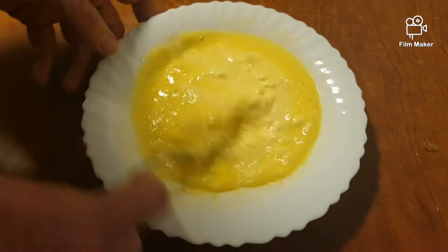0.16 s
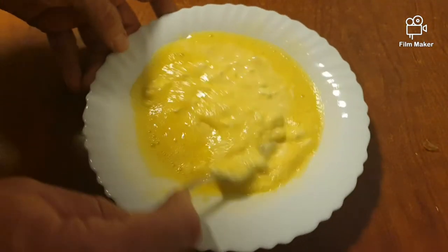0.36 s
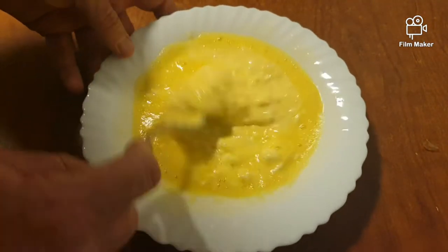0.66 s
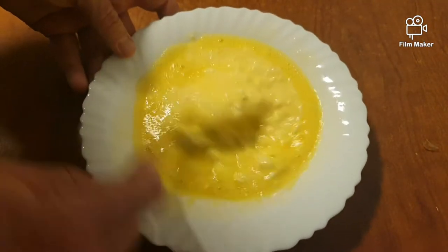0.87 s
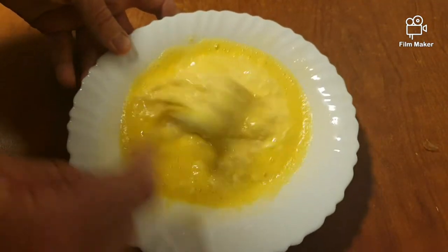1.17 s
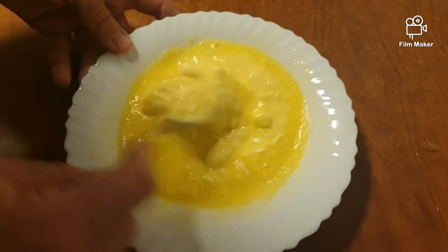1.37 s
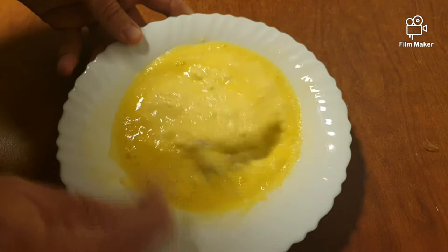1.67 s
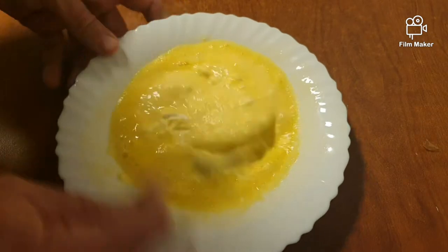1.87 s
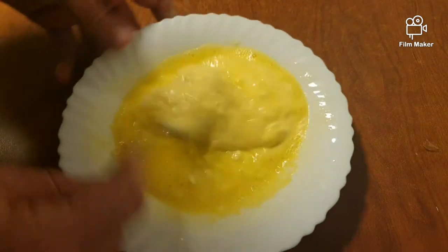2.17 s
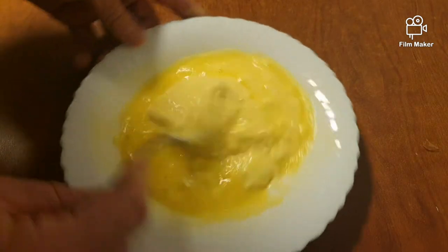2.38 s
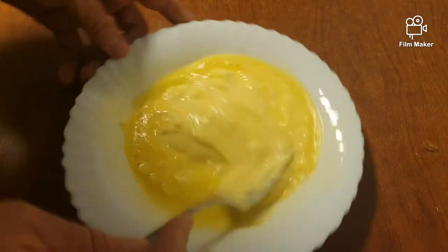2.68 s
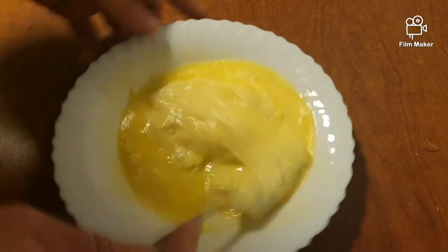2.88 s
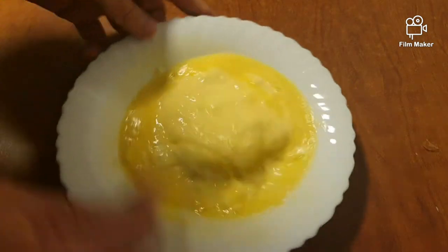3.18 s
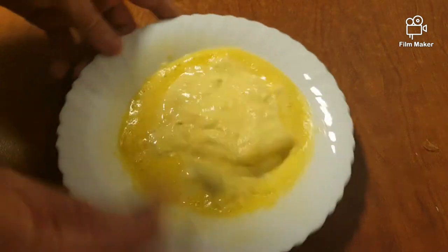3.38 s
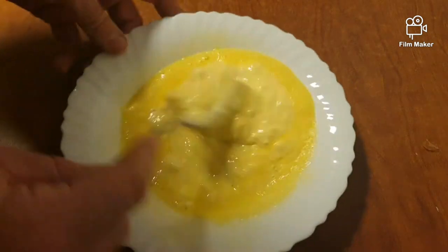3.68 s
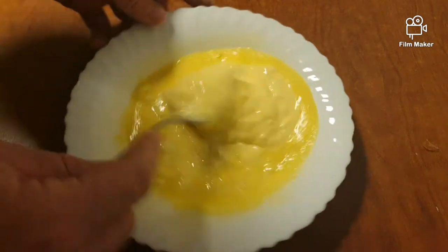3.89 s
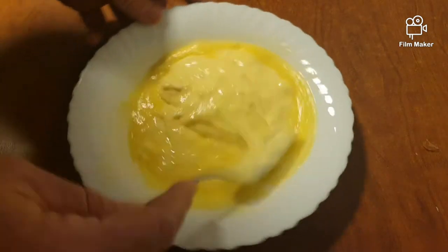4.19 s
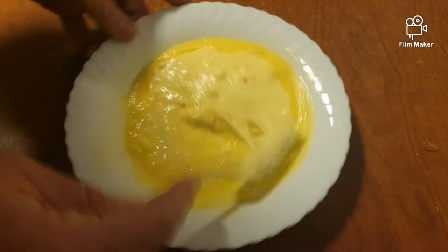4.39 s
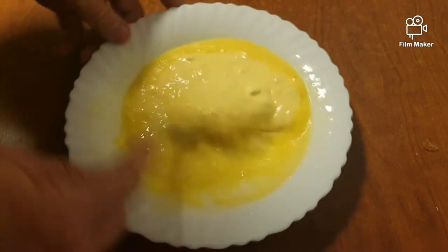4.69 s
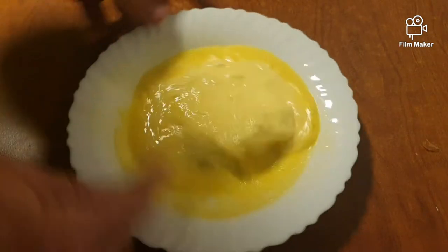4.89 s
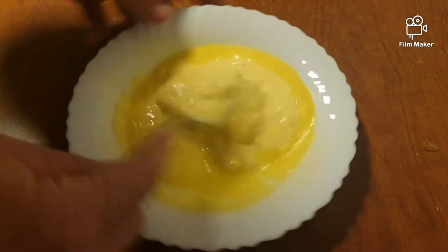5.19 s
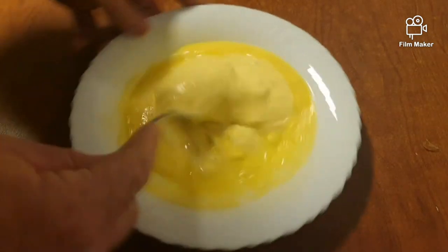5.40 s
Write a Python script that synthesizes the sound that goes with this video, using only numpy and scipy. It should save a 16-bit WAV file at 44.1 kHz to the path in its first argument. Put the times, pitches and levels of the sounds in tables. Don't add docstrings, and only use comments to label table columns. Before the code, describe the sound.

A fork beats thick egg batter on a ceramic plate standing on a wooden table, miked closely by a phone in a small kitchen. Loud strokes land at about 0.07 and 0.3 s, followed by light tine ticks and a wet plop near 0.4 s. A gap follows, with a soft table knock at 0.7 and a weak, bright glancing clink at 0.8 s. From 1.0 s the beating is regular, roughly one stroke every 0.2 s, continuing to the cutoff just after 5.5 s. Each stroke is a short, hard, bright clack with a damped plate ring, often led by a tiny scrape, with a faint low thump in the table. Between strokes the batter sloshes and plops with short low tones and wet snaps, while the plate shuffles in small jerks, most noticeably around 1.1 s. A short room reverberation follows the touches over a faint, steady low hum.

```python
import sys
import numpy as np
from scipy import signal
from scipy.fft import rfft, irfft, next_fast_len
from scipy.io import wavfile
from scipy.ndimage import map_coordinates

SR = 44100
rng = np.random.default_rng(int(sys.argv[2]) if len(sys.argv) > 2 else 0)


def volts_from_decibels(level):
    exponent = np.asarray(level, float) / 20
    return 10 ** exponent


def int16_out(signal):
    q = np.round(np.clip(np.atleast_2d(signal).T, -1, 1) * 32767)
    wavfile.write(sys.argv[1], SR, q.astype(np.int16))


N = 244314

# (time [s], peak [dB], middle ring [dB], bright ring [dB], thump [dB])
BLOWS = [(0.0688, -2.5, -5, -3, -26.5), (0.2951, -5, -10, -1.5, -28.5), (1.0183, -3.5, -8, 4.5, -39),
         (1.26, -1, -4, 0, -26), (1.484, -1, -1.5, -3, -25), (1.702, 5, -0.5, -2, -23),
         (1.9196, 2.5, 2, -2, -20), (2.1283, 2, 3.5, -2.5, -25.5), (2.339, -1, -2, -4.5, -26),
         (2.5372, -0.5, 1, -3.5, -21.5), (2.7306, -1, -2, 1, -24), (2.944, -3.5, -7, -6, -28),
         (3.1579, -1, 0, -4, -29.5), (3.367, -1.5, 0, -1, -35), (3.591, -1, 0, -0.5, -22.5),
         (3.8106, 0, -5.5, 4, -21.5), (4.0434, -1.5, -3, 6.5, -24.5), (4.2557, -1, -8, -1, -24),
         (4.4576, 1.5, -6, 0, -21), (4.6652, 1, -9, -3, -20.5), (4.8746, 3, -8.5, 1, -19.5),
         (5.0843, 3.5, -10.5, 2.5, -19.5), (5.2973, 3, -6, 0.5, -18), (5.5131, -2, -4.5, 5.5, -24)]
# (time [s], peak [dB], middle ring [dB], bright ring [dB], thump [dB])
GLANCES = [
    (0.8017, -17.5, 8, 9.5, -32),
]
# (time [s], peak [dB], colour [Hz], length [s])
GRAZES = [(0.034, -33, 3480, 0.009), (0.0442, -12.5, 3900, 0.0065), (0.275, -15.5, 3150, 0.0055),
          (0.284, -21, 4040, 0.0036), (0.981, -32.5, 4100, 0.0037), (1.223, -37, 4200, 0.016),
          (1.458, -31, 4000, 0.0023), (1.6757, -20.5, 2970, 0.0068), (1.886, -28.5, 3180, 0.007),
          (1.9034, -20, 4000, 0.0072), (2.1165, -22, 3970, 0.0019), (2.326, -18, 2420, 0.00394),
          (2.5267, -22, 3640, 0.0082), (2.712, -24, 2900, 0.014), (2.933, -25.5, 4050, 0.0023),
          (3.354, -21.5, 3720, 0.0073), (3.5585, -22.5, 3300, 0.016), (3.574, -21, 5000, 0.0018),
          (3.794, -24, 3730, 0.0048), (4.031, -19, 4200, 0.0052), (4.237, -25.5, 3680, 0.011),
          (4.44, -24.5, 4160, 0.013), (4.6496, -14.5, 3000, 0.006), (4.866, -28, 4760, 0.0073),
          (5.074, -33, 4260, 0.006), (5.28, -19.5, 2930, 0.0056)]
# (time [s], peak [dB], colour [Hz])
TICKS = [(0.0162, -38.5, 2330), (0.3962, -26.5, 4100), (0.4085, -20, 4170), (0.909, -47.5, 5200),
         (0.992, -36.5, 4200), (1.001, -43, 4200), (0.529, -28, 3800), (1.626, -34, 2730),
         (1.657, -48, 2520), (1.775, -29, 5560), (2.9923, -26, 2480), (3.128, -38, 2660), (3.29, -35, 2640),
         (3.344, -36, 4950), (3.444, -37, 1600), (3.961, -40, 4900), (4.012, -47, 5000), (4.124, -44, 2600),
         (5.044, -44, 4260), (5.445, -28.5, 2250)]
# (centre [Hz], width [Hz], level [dB])
PLATE_CONTACT = [(1420, 870, 2.5), (2544, 825, 7), (3300, 870, -11), (4050, 660, 9), (5240, 680, 4),
                 (5560, 440, 3.5), (6345, 1040, 0.5), (7040, 370, -33), (9400, 1800, -4.5),
                 (12510, 830, -2.5), (14400, 1600, -10), (15100, 250, -41)]
# (centre [Hz], width [Hz], level [dB])
PLATE_RING = [(1293, 24, -1.5), (1631, 79, 3.5), (2013, 39, -5.5), (2500, 210, -10), (2417, 48, 4),
              (2770, 126, 1.5), (3257, 220, 4.5), (4180, 44, -28.5), (4640, 52, 5.5), (4803, 135, 2),
              (6143, 30, -4), (12110, 60, -11.5)]
# (time [s], peak [dB], pitch [Hz], snap [dB])
PLOPS = [(0.192, -31, 850, -27), (0.349, -25.5, 818, -2), (0.4077, -13.5, 472, -5),
         (0.717, -27.5, 445, -23), (0.718, -29.5, 1400, -5), (0.7293, -38, 1500, -16),
         (1.781, -28.5, 448, -25), (1.835, -26.5, 797, 1.5), (2.03, -31, 790, 6.5), (2.263, -16, 775, 11),
         (2.464, -25, 730, 10), (2.481, -26.5, 1420, 13), (2.58, -29, 426, -15), (2.837, -29, 840, -4),
         (3.039, -32, 400, 8), (3.08, -29, 537, -2.5), (3.718, -29, 576, -6), (3.96, -26.5, 653, -2),
         (4.146, -29.5, 425, -28), (4.373, -21, 721, 10.5), (4.597, -24.5, 660, 7.5),
         (4.782, -25.5, 740, 6), (4.977, -39, 1430, -9), (5.008, -32.5, 795, 24), (5.197, -29.5, 670, 3),
         (5.245, -22.5, 796, 4), (5.434, -31, 433, -16)]
# (centre [s], spread [s], level [dB])
FOLDS = [(0.44, 0.093, -48.5), (0.77, 0.042, -43.5), (1.65, 0.029, -43), (1.94, 0.06, -55),
         (2.6, 0.063, -42.5), (2.8, 0.021, -75), (3.12, 0.082, -53.5), (3.47, 0.11, -48.5),
         (3.86, 0.012, -55), (4.14, 0.078, -47), (4.5, 0.067, -44), (4.9, 0.07, -44.5), (5.3, 0.14, -48),
         (5.5, 0.063, -43.5)]
# (frequency [Hz], density [dB per Hz])
SLOSH = [(250, 7), (450, -2.5), (800, -0.5), (1500, -7), (3000, -15), (6000, -20.5), (16000, -37)]
# (centre [Hz], width [Hz], level [dB])
BUBBLES = [(621, 110, -11), (850, 140, -14), (1252, 320, -15.5), (1690, 280, -17)]
# (centre [Hz], width [Hz], level [dB])
TABLE_TOP = [(97.3, 26, -15.5), (147.3, 6.3, 1), (189.3, 5.8, 7), (235, 4.3, -5.5), (267.1, 6.75, 6),
             (295, 12.7, 2), (337.3, 5.9, -1.5), (368.5, 11.1, 2), (386.1, 7.6, -7), (443.3, 36.5, -10),
             (553.5, 7.2, -6), (688.4, 17.5, -15), (818, 30, -19), (1230, 170, -21.5)]
# (time [s], peak [dB], frame shake [dB])
BUMPS = [
    (0.718, -20, -57),
    (3.071, -26, -69),
    (3.592, -30.5, -36),
    (4.146, -27.5, -52),
]
# (centre [s], spread [s], deep modes [dB], upper modes [dB])
SHUFFLES = [(0.429, 0.024, -42, -42), (0.8, 0.027, -52, -57), (0.971, 0.03, -35, -35.5),
            (1.09, 0.047, -27.5, -35), (1.68, 0.076, -38, -35), (2.56, 0.022, -46, -53),
            (2.79, 0.087, -52, -78), (3.18, 0.085, -39.5, -43), (3.47, 0.088, -58, -41.5),
            (3.76, 0.038, -55, -38), (4.18, 0.056, -52, -34), (4.65, 0.2, -55, -48),
            (5.28, 0.092, -55, -53), (5.52, 0.11, -52, -38)]
# (frequency [Hz], density [dB per Hz])
HUM = [(15, -21), (25, 19), (197, 6), (266, 18.5), (902, -31), (1150, -49), (3600, -48), (4130, -13),
       (15200, -67), (16500, -66.5)]
# (frequency [Hz], t60 [s])
KITCHEN = [(300, 0.4), (1800, 0.38), (4800, 0.35), (12800, 0.27)]

SIZE = 16384
HZ = np.fft.rfftfreq(SIZE, 1 / SR)
TOP_HZ, STEADY_TOP_HZ = 16600, 15760
LOW_RING_DB = -2.5
TICK_S, SPARKLE_DB = 0.0056, -12
SNAP_HZ = 2250
SHAKE_DB, DEEP_DB, DRAG_S = -55.5, 0.5, 0.07
STIR_FROM_S, CREEP_DB, STIR_DB = 1.6, -59.5, -53.5


def fork():
    out = np.zeros((2, N + SIZE))
    blows = BLOWS + GLANCES
    rooms = tails(count=len(blows))
    for (s, db, mid_db, bright_db, _), room in zip(blows, rooms):
        tilt_db = [(900, LOW_RING_DB - 3), (1300, LOW_RING_DB), (1600, LOW_RING_DB),
                   (2000, mid_db), (2900, mid_db - 3.5), (3500, 0), (5000, 0),
                   (6500, 0.65 * bright_db), (7500, bright_db)]
        contact = resonances(PLATE_CONTACT, HZ, spread_db=2.2)
        ring = volts_from_decibels(4.5) * resonances(PLATE_RING, HZ, spread_db=3)
        colour = (contact + ring) * volts_from_decibels(along(tilt_db, HZ))
        tines = chatter(0.0036, count=12, alike=0.33)
        add(out, s, db - 5.5, colour, tines, volts_from_decibels(-6.0) * room, pan_db=0.6)

    scratches = GRAZES + [(*tick, TICK_S) for tick in TICKS]
    sparkle = resonances([(11900, 14000, SPARKLE_DB)], HZ) ** 2
    blunt = 1 + (1j * HZ / 6900) ** 2 + 0.6j * HZ / 6900
    for (s, db, hz, length_s), room in zip(scratches, np.tile(rooms[::-1], (2, 1, 1))):
        colour = resonances([(hz, 0.8 * hz, 0)], HZ) ** 2 / blunt + sparkle
        tines = chatter(length_s, count=8, alike=0.48)
        add(out, s - 0.0004, db + 0.18, colour, tines, volts_from_decibels(-4) * room, pan_db=2.5)
    return out[:, :N]


def batter():
    out = np.zeros((2, N + SIZE))
    rooms = np.tile(tails(count=len(PLOPS) // 3), (3, 1, 1))
    wet = resonances([(SNAP_HZ, 0.5 * SNAP_HZ, 0)], HZ) ** 2
    muffle = 1j * HZ / (1j * HZ + 300) / (1 + 1j * HZ / (1.6 * SNAP_HZ)) ** 2
    for (s, db, hz, snap_db), room in zip(PLOPS, rooms):
        pocket = resonances([(hz, 0.1 * hz, 0), (1.645 * hz, 0.31 * hz, -9)], HZ) / (1 + 1j * HZ / 2500)
        snap = volts_from_decibels(snap_db - 12.5) * wet
        edge = volts_from_decibels(snap_db - 31.5) * resonances([(4000, 1450, 0)], HZ)
        colour = (pocket + snap) * muffle + edge
        add(out, s + 0.001122, db + 3, colour, np.ones((2, 1)), volts_from_decibels(-5.0) * room, pan_db=2.2)

    lumps = map_coordinates(rng.standard_normal(400), [np.arange(N) * 18 / SR])

    def slosh_colour(f):
        return volts_from_decibels(along(SLOSH, f)) * (1 + 4 * np.abs(resonances(TABLE_TOP[8:], f)))

    wash = pair(slosh_colour, split_hz=500) * unit(volts_from_decibels(3.5 * lumps))
    for hz, width_hz, db in BUBBLES:
        bursts = rng.standard_normal(N) * (rng.uniform(0, 1, N) < 70 / SR)
        bubbles = filtered(bursts, lambda f: resonances([(hz, width_hz, 0)], f) ** 2)
        wash = wash + unit(bubbles) * volts_from_decibels(db)
    return out[:, :N] + volts_from_decibels(1.0) * swells(*np.transpose(FOLDS), STIR_DB) * wash


def table():
    out = np.zeros(N + SIZE)
    thumps = [(s, thump_db, SHAKE_DB) for s, *_, thump_db in BLOWS + GLANCES]
    for s, db, shake_db in thumps + BUMPS:
        top = resonances(TABLE_TOP, HZ, spread_db=2.5) * volts_from_decibels(along([(200, DEEP_DB), (240, 0)], HZ))
        thud = resonances([(323, 65, -1), (60, 130, min(shake_db - db, 0) + 12.5)], HZ)
        slip_s = DRAG_S * rng.uniform(0, 1, (20, 1))
        slips = rng.normal(0, 0.2, 20) @ np.exp(-2j * np.pi * slip_s * HZ)
        ring = irfft((top * (1 + slips) + thud) / (1 + 1j * HZ / 1200) ** 3)
        out[round(s * SR):][:SIZE] += volts_from_decibels(db + 1.5) * ring / np.abs(ring).max()

    s, spread_s, *levels_db = np.transpose(SHUFFLES)
    mid = out[:N]
    for level_db, modes in zip(levels_db, (TABLE_TOP[:3], TABLE_TOP[3:])):
        def body(f):
            return resonances(modes, f) / (1 + 1j * f / 1300) ** 2

        jerks = rng.standard_normal(N) * (rng.uniform(0, 1, N) < 350 / SR)
        surges = swells(s, spread_s, level_db, CREEP_DB)
        mid = mid + filtered(surges * jerks, body) / np.std(filtered(jerks, body))
    side = volts_from_decibels(-2.5) * filtered(mid, lambda f: (0.16 + 1j) * f / (f + 900))
    return np.array([mid + side, mid - side])


def house_hum():
    return volts_from_decibels(-54.0) * pair(lambda f: volts_from_decibels(along(HUM, f)) * f / (f + 60), split_hz=940)


def port_air():
    return volts_from_decibels(-56) * pair(lambda f: f / (f + 30) / (1 + (f / 110) ** 4), split_hz=3)


def add(out, s, db, colour, contacts, room, pan_db=0):
    direct = colour * contacts
    peak = np.abs(irfft(np.mean(direct, axis=0))).max()
    far = room * colour * np.sqrt(np.mean(np.abs(contacts) ** 2))
    gain = volts_from_decibels(db + np.array([[0.5], [-0.5]]) * pan_db) / peak
    fade = np.clip(np.linspace(5, -0.2, SIZE), 0, 1)
    out[:, round(s * SR):][:, :SIZE] += irfft(direct + far) * gain * fade


def chatter(length_s, count, alike):
    when = np.sort(rng.uniform(0, 1, (3, count)), axis=1)
    when -= when[:, :1]
    size = rng.normal(0, 1, when.shape) * np.exp(-1.2 * when)
    size[:, 0] = 0.62
    delays = np.exp(-2j * np.pi * HZ * length_s * when[..., None])
    both, left, right = np.sum(size[..., None] * delays, axis=1)
    right = right * np.exp(-2j * np.pi * HZ * 0.000397)
    share = np.clip(alike, 0, 1)
    return share * both + (1 - share) * np.array([left, right])


def tails(count):
    hz, t, z = signal.stft(rng.standard_normal((count, 2, SIZE - 2048)), SR, nperseg=128)
    decay = volts_from_decibels(-60 * t / along(KITCHEN, hz)[:, None])
    tail = signal.istft(z * decay, SR, nperseg=128)[1]
    tail = tail * np.clip(np.arange(tail.shape[-1]) / (0.002 * SR), 0, 1)
    return rfft(tail / np.linalg.norm(tail[0, 0]), SIZE) * (HZ < STEADY_TOP_HZ)


def swells(s, spread_s, db, rest_db):
    t = np.arange(0, N + 64, 64) / SR
    rest = volts_from_decibels(rest_db - 6.3 * np.clip((STIR_FROM_S - t) / 0.1, 0, 1))
    bells = volts_from_decibels(db) @ np.exp(-0.5 * ((t - s[:, None]) / spread_s[:, None]) ** 2)
    return np.interp(np.arange(N) / SR, t, rest + bells)


def resonances(modes, f, spread_db=0):
    centre, width, db = np.transpose(modes)[..., None]
    sign = (-1) ** np.arange(len(centre))[:, None]
    gain = sign * volts_from_decibels(db + spread_db * rng.standard_normal(centre.shape))
    damping = 1j * f * width
    return np.sum(gain * damping / (centre * centre - f * f + damping), axis=0)


def pair(response, split_hz):
    def mid_side(f):
        turn = np.pi / 4 * f / (f + split_hz)
        return response(f) * (f < STEADY_TOP_HZ) * [np.cos(turn), np.sin(turn)]

    mid, side = filtered(rng.standard_normal((2, N)), mid_side)
    return unit(np.array([mid + side, mid - side]))


def filtered(x, response):
    m = next_fast_len(N + SR // 2)
    return irfft(rfft(x, m) * response(np.fft.rfftfreq(m, 1 / SR)), m)[..., :N]


def along(points, hz):
    f, v = np.transpose(points)
    return np.interp(np.log(hz + 1), np.log(f + 1), v)


def unit(x):
    return x / np.sqrt(np.mean(x ** 2) + 1e-20)


def scene():
    return fork() + batter() + table() + house_hum() + port_air()


def low_pass(x):
    return signal.sosfilt(signal.butter(12, 16830, fs=SR, output="sos"), x)


def record(dry):
    band = filtered(dry, lambda f: 1 / (1 + (f / TOP_HZ) ** 120) * f ** 2 / (f ** 2 + 28 ** 2))
    soft = band / (1 + np.abs(band) ** 8) ** (1 / 8)
    return low_pass(soft)


dry = scene()
out = record(dry)
int16_out(out)
```